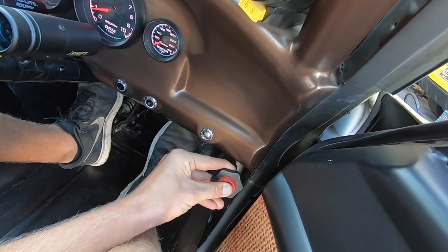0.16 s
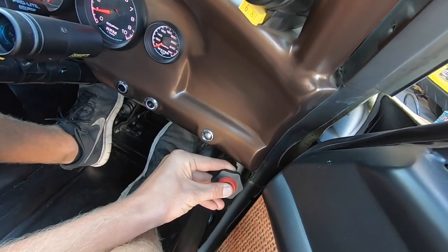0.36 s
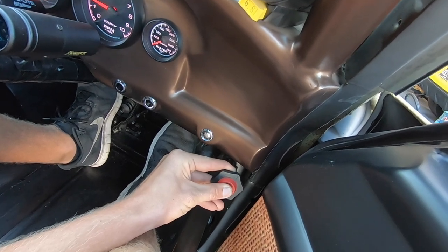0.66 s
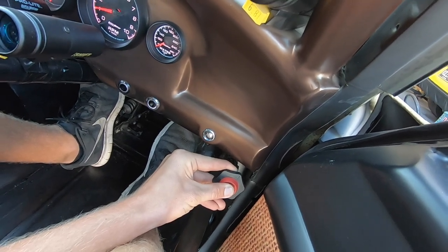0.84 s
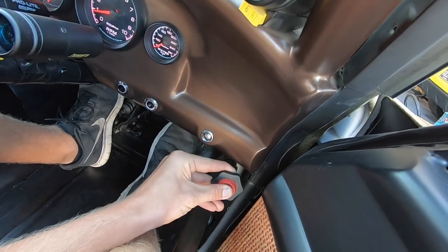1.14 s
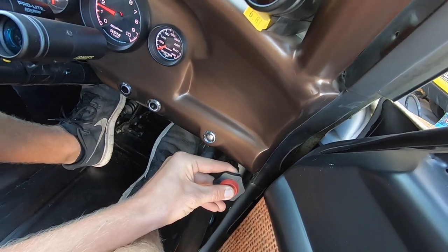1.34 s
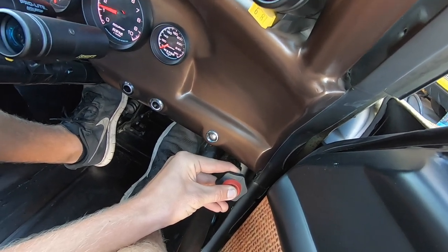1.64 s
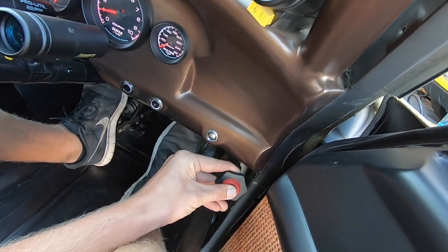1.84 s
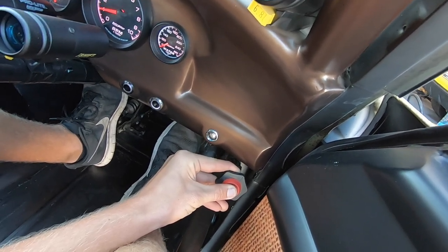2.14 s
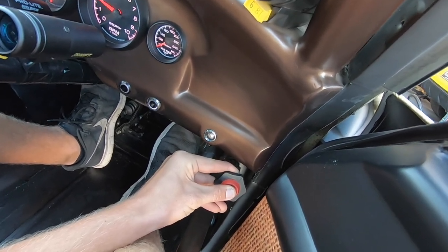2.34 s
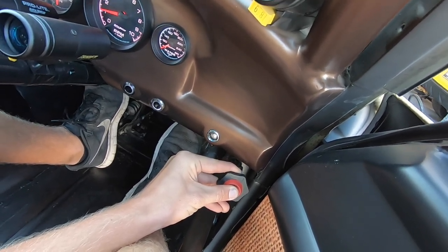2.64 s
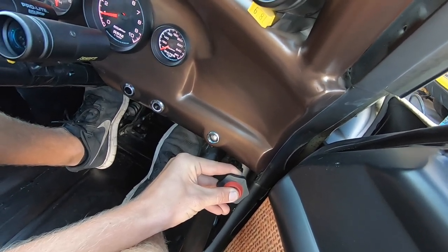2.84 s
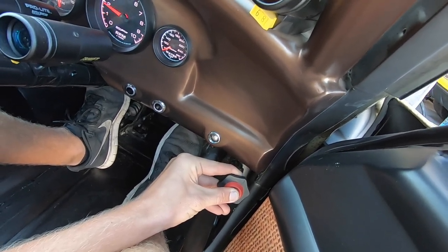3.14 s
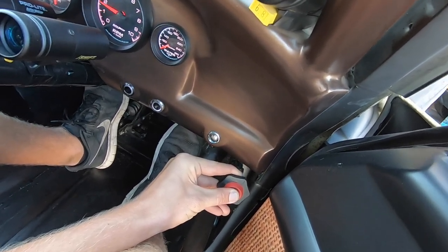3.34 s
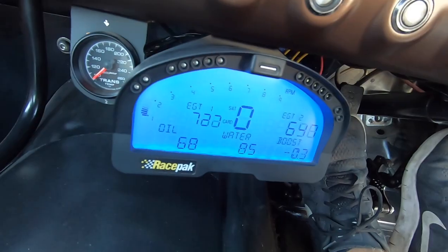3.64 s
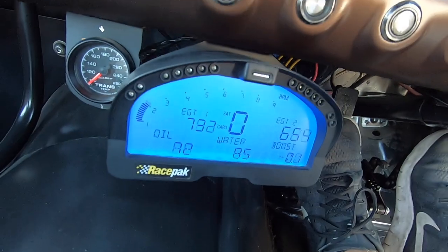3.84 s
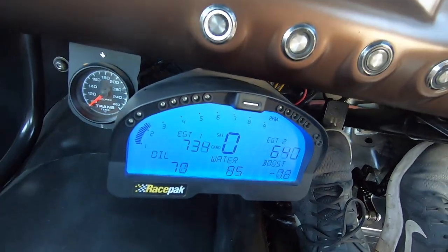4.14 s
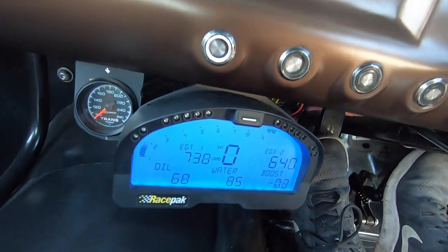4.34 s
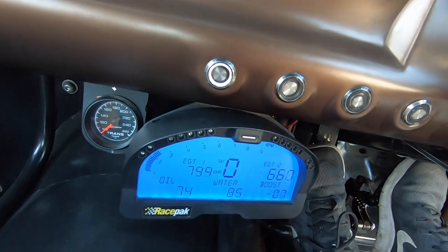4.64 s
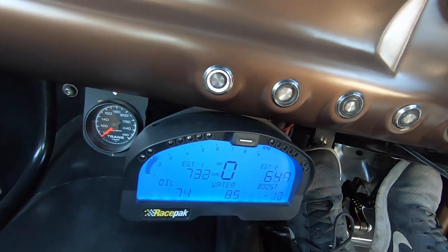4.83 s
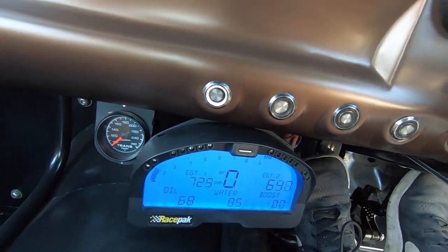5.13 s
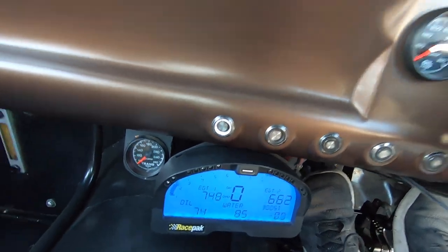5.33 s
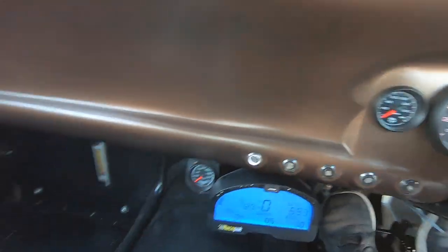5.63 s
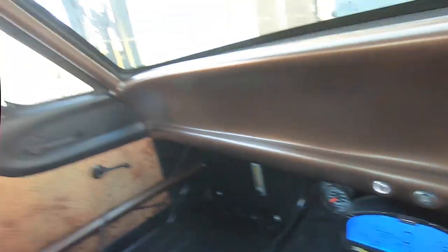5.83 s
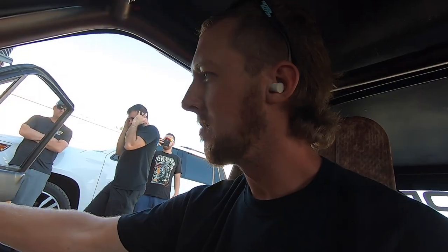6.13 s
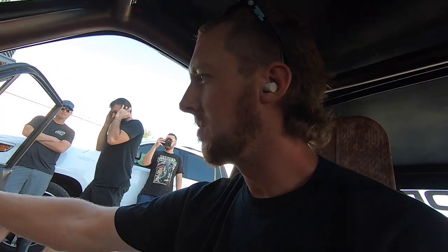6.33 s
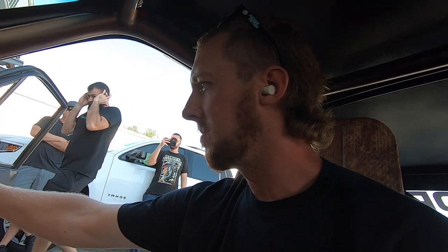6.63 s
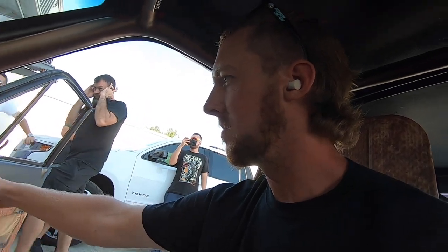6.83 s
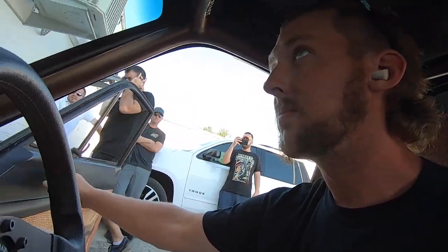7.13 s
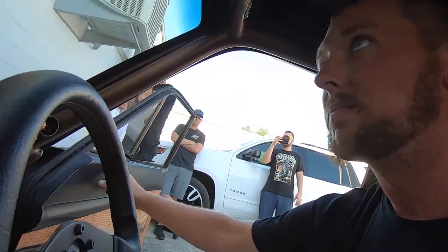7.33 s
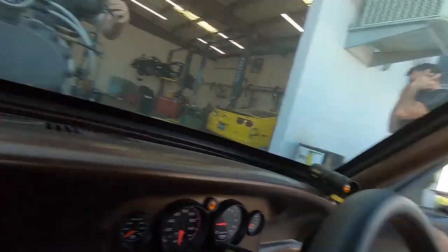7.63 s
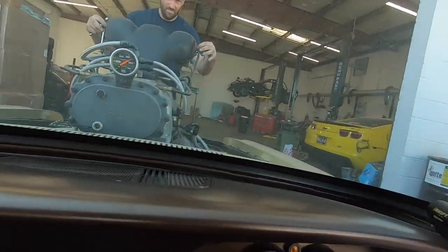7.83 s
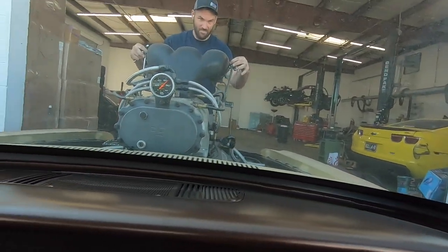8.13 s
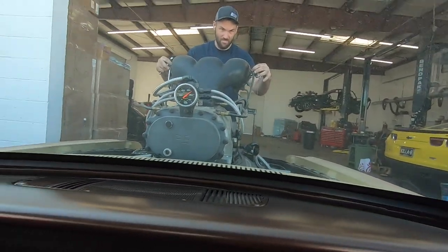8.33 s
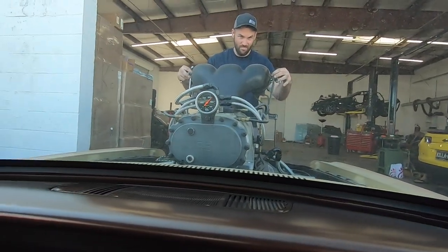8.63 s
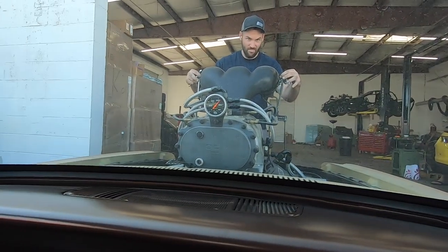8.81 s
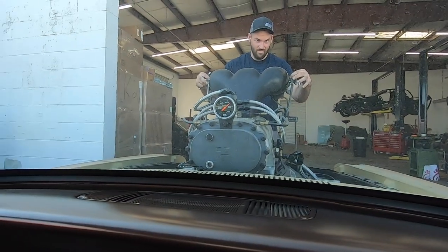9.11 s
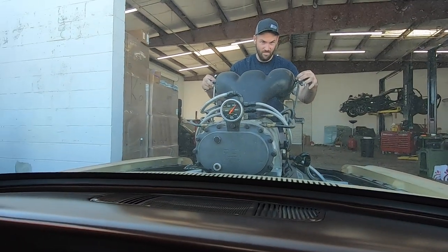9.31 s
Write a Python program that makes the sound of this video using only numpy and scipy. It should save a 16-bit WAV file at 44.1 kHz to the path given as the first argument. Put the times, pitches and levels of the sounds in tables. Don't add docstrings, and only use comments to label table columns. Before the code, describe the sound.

A powerful supercharged eight-cylinder engine hunts at idle throughout, heard inside a bare metal car cabin beside a workshop. From 0 to 3.5 seconds the microphone is in the footwell: strong surges peak near 0.45, 1.3, 2.2 and 3.1, each climbing fast from a slow lumpy throb to a booming, raspy roar, then sagging. In the deep lulls single firings bark hard, ringing the firewall, with missed beats cutting holes in the roar. At 3.5 the sound shifts to the dash, with less panel thump and a duller low roar; surges peak around 3.75, 4.4, 5.1 and 5.8. From 6 seconds, at the windscreen, the tone becomes more mid-range and steadier, surges arriving about every 0.6 to 0.7 seconds with shallower lulls and fewer, softer barks. Cabin bass, knocking panels and low mount rumble continue to the end, around 9.6, without the engine stopping.

```python
import sys
import numpy as np
from scipy import signal
from scipy.io import wavfile
from scipy.ndimage import uniform_filter1d

SR = 44100
rng = np.random.default_rng(int(sys.argv[2]) if len(sys.argv) > 2 else 0)


def convert_level_to_amplitude(level_db):
    exponent = np.asarray(level_db, float) / 20
    return 10 ** exponent


def to_wav(sig):
    pcm = np.clip(np.atleast_2d(sig), -1, 1) * 32767
    pcm = np.round(pcm).astype(np.int16)
    wavfile.write(sys.argv[1], SR, pcm.T)


N = 417627


def rms_one(x):
    return x / np.sqrt(np.mean(x ** 2) + 1e-20)


def at_hz(points, hz):
    points_hz, points_db = np.array(points).T
    return np.interp(np.log(hz), np.log(np.maximum(points_hz, 1)), points_db)


def band(x, low_hz, high_hz, order=2):
    return signal.sosfilt(signal.butter(order, [low_hz, high_hz], "band", fs=SR, output="sos"), x)


def fade(x, seconds):
    r = np.exp(-1 / (seconds * SR))
    return signal.lfilter([1 - r], [1, -r], x + 1e-18)


def resonate(x, modes):
    out = 0
    for k, (hz, width_hz, db) in enumerate(modes):
        r = np.exp(-np.pi * width_hz / SR)
        poles = [1, -2 * r * np.cos(2 * np.pi * hz / SR), r * r]
        ring = signal.lfilter([(1 - r * r) / 2, 0, (r * r - 1) / 2], poles, x)
        out = out + (-1) ** k * convert_level_to_amplitude(db) * ring
    return out


def evened(x, seconds):
    power = uniform_filter1d(x ** 2, int(seconds * SR), mode="mirror")
    return x / np.sqrt(power + 0.01 * np.mean(power))


def drift(per_s):
    r = np.exp(-128 * np.pi * per_s / SR)
    slow = signal.lfilter([1], [1, -2 * r, r * r], rng.standard_normal(N // 64 + 502))[500:]
    return np.interp(np.arange(N) / 64, np.arange(len(slow)), rms_one(slow))


CHANGES_S = [3.5, 6.0]


def by_place(values):
    edges_s = np.ravel([(s - .1, s + .1) for s in CHANGES_S])
    return np.interp(np.arange(N) / SR, edges_s, np.asarray(values)[[0, 1, 1, 2]])


# catch t/s, top t/s, catch rate f/Hz, top rate f/Hz (firings)
SURGES = [(-0.62, -0.42, 62, 135), (0.26, 0.45, 59.6, 138), (1.16, 1.34, 65.6, 139),
          (2.03, 2.21, 58.5, 136), (2.92, 3.14, 61.5, 148), (3.55, 3.74, 66, 129), (4.22, 4.43, 64, 125),
          (4.96, 5.11, 77, 119), (5.62, 5.83, 62, 134), (6.25, 6.46, 78, 120), (6.86, 7.07, 80.6, 123),
          (7.4, 7.67, 78, 123), (8.04, 8.31, 80.8, 119), (8.73, 8.91, 76, 118), (9.35, 9.64, 81, 118)]


def speed():
    sag_per_s2, crawl_lead_hz = 150, 3.0
    catch_s, top_s, slow, fast = np.transpose(SURGES)[:4]
    sagged_s = top_s[:-1] + (fast[:-1] - slow[1:]) / sag_per_s2
    crawl_s = np.minimum(sagged_s, catch_s[1:] - .01)
    s = np.ravel([catch_s, top_s, np.append(crawl_s, 99)], "F")
    rates = np.ravel([slow, fast, np.append(slow[1:] + crawl_lead_hz, 0)], "F")
    per_s = np.interp(np.arange(N) / SR, s, rates)
    return uniform_filter1d(per_s, int(.04 * SR), mode="nearest")


# shut-off delay t/s, strength gain level/dB, lull depth level/dB
LOAD = [(-0.01, 0.0, 14.7), (0.033, -1.0, 24.7), (-0.005, 0.4, 21.3), (0.019, 0.1, 22.2),
        (0.004, -0.7, 21.2), (-0.018, 0.8, 13.8), (-0.005, 1.3, 19.2), (0.016, 1.7, 18.5),
        (-0.022, 0.7, 14.6), (-0.068, 0.0, 7.7), (0.0, -1.8, 10.6), (-0.001, -1.9, 9.3),
        (-0.007, -1.5, 14.4), (0.003, -1.8, 6.8), (0.0, -2.6, 8.0)]


def effort(top_db, early_s, hold_s, droop_db, close_s, rest_s, lull_share, lull_db, catch_db):
    catch_s, top_s = np.transpose(SURGES)[:2]
    late_s, extra_db, depth_db = np.transpose(LOAD)
    depth_db = lull_share * depth_db + lull_db
    shut_s = top_s + hold_s + late_s + close_s
    wake_s = np.minimum(shut_s + rest_s, np.append(catch_s[1:], 99) - .05)
    wake_s = np.maximum(wake_s, shut_s + .005)
    s = np.ravel([catch_s, top_s - early_s, shut_s - close_s, shut_s, wake_s], "F")
    start_db = np.minimum(catch_db, np.roll(depth_db, 1))
    db = np.ravel([start_db, -extra_db, droop_db - extra_db, depth_db, depth_db], "F")
    return by_place(top_db) - np.interp(np.arange(N) / SR, np.maximum.accumulate(s), db)


CYLINDER_DB = [-2, -6.5, 5, 1.5, 0.5, -3.5, -4.2, -1.2]


def firings(per_s, spread_db):
    at = np.flatnonzero(np.diff(np.cumsum(per_s / SR).astype(int)))
    ragged = np.clip((125 - per_s[at]) / 55, .35, 1.3)
    chance = np.clip(rng.standard_normal(1500)[:len(at)], -2.5, 1.4)
    clicks = np.zeros(N)
    clicks[at] = convert_level_to_amplitude(np.resize(CYLINDER_DB, len(at)) + spread_db * ragged * chance)
    return clicks


# t/s, depth level/dB
STUMBLES = [(0.07, 5), (0.23, 4), (1.68, 6), (2.9, 5), (3.53, 9), (3.99, 4), (4.2, 2.5), (4.55, 3),
            (4.69, 8), (5.59, 4), (5.93, 10), (6.14, 3), (6.82, 3), (7.37, 3), (7.45, 4), (8.1, 5),
            (8.24, 4), (8.69, 8), (9.35, 6)]


def low_end(per_s):
    swell_hz, swell_octaves, stumble_s = 97, .3, .03
    tone_base_db, tone_swell_db, tone_pull_db = -17, 4.5, 3.5
    bass_base_db, bass_swell_db, bass_pull_db = -14.3, 1.8, 2.5
    tone_loss_db, bass_loss_db = by_place([4, 20, 12]), 2.5
    t = np.arange(N) / SR
    pulling = np.clip(fade(np.gradient(per_s) * SR, .02) / 150, 0, 1)
    octaves = np.log2(per_s / swell_hz)
    tuned = np.exp(-(octaves / swell_octaves) ** 2)
    above = np.maximum(octaves, 0)
    gaps_db = sum(db * np.exp(-((t - s) / stumble_s) ** 2) for s, db in STUMBLES)
    tone_db = tone_base_db + tuned * tone_swell_db + tone_pull_db * pulling - tone_loss_db * above
    bass_db = bass_base_db + tuned * (bass_swell_db + bass_pull_db * pulling)
    return tone_db, bass_db - bass_loss_db * above - gaps_db


COASTING_DB = [-5, -5, -3, -3, 0, 0]
# f/Hz, width f/Hz, level/dB
CABIN = [(91, 9, 0), (108, 25, -12), (68, 30, -17)]


def boom(per_s, tone_db, bass_db, clicks):
    coasting = np.clip(1 - fade(np.gradient(per_s) * SR, .03) / 150, 0, 1)
    places_s = [0, CHANGES_S[0], *CHANGES_S, CHANGES_S[1], N / SR]
    places_db = np.interp(np.arange(N) / SR, places_s, COASTING_DB)
    stumbling = 20 * np.maximum(np.log2(84 / per_s), 0)
    tone_db = tone_db + coasting * (places_db - stumbling) + 1.2 * drift(14)
    wander = (.2 + .3 * coasting * stumbling) * drift(9)
    tone = np.sqrt(2) * convert_level_to_amplitude(tone_db) * np.sin(2 * np.pi * np.cumsum(per_s) / SR + wander)
    rest = np.sqrt(np.maximum(convert_level_to_amplitude(2 * bass_db) - convert_level_to_amplitude(2 * tone_db), convert_level_to_amplitude(2 * (bass_db - 9))))
    rest = rest * convert_level_to_amplitude(-5 - places_db)
    uneven = clicks - 0.7152 * (clicks > 0) + 0.014 * rng.standard_normal(N)
    both = tone + rest * evened(band(resonate(uneven, CABIN), 58.7, 120), 0.22)
    side = convert_level_to_amplitude(-45) * rms_one(band(rng.standard_normal(N), 50, 130))
    return convert_level_to_amplitude(bass_db) * evened(both, 0.0567) + side * [[1], [-1]]


# t/s, peak level/dB, preceding misfire dip level/dB
BARKS_NEAR = [(0.0385, -27.7, 4), (0.1196, -25, 16), (0.139, -20.5, 0.6), (0.2517, -16.2, 12.7),
              (0.8194, -34.7, 5.8), (0.8824, -22.7, 0.5), (0.945, -23.1, 1.7), (1.082, -19.5, 14.4),
              (1.144, -17.9, 3.3), (1.2199, -17.3, 0.5), (1.732, -21.1, 7.8), (1.7898, -21.5, 1.0),
              (1.9053, -19.2, 3.6), (1.9757, -19.4, 4.0), (2.0156, -15.0, 1.6), (2.0812, -22.5, 3.1),
              (2.212, -18.9, 2.6), (2.322, -22.1, 1.7), (2.508, -31.2, 3.5), (2.5673, -20.8, 6.6),
              (2.6479, -20.3, 13.4), (2.7606, -17.6, 10.0), (2.84, -22.3, 16.7), (2.9367, -15.5, 4.3),
              (3.0041, -15.4, 0.5), (3.152, -22.4, 1.9), (3.4496, -39.7, 4.2)]
# t/s, peak level/dB, dip level/dB
BARKS_FAR = [(3.8826, -25.2, 3.1), (3.9404, -20.7, 6.1), (4.14, -26.9, 7.1), (4.1987, -25.9, 4.5),
             (4.685, -33.1, 5.6), (4.781, -23.7, 0.5), (4.84, -21.6, 0.5), (4.915, -18.3, 0.7),
             (5.3104, -24.1, 4.8), (5.3842, -24.8, 2.4), (5.5104, -25.1, 2.4), (5.5997, -30.7, 8.2),
             (5.8506, -17.7, 0.5), (6.05, -24.9, 3.9), (6.123, -24.4, 0.5), (6.6997, -27.3, 10.9),
             (6.9005, -21.9, 0.5), (7.274, -35.5, 0.5), (7.3723, -30.1, 1.6), (7.8705, -26.4, 3.2),
             (7.9274, -21.3, 5.4), (7.982, -24.2, 8.8), (8.106, -34.0, 4.1), (8.465, -31.4, 6.5),
             (8.5218, -18.0, 4.7), (8.5806, -24.1, 2.5), (8.639, -28.8, 2.5), (8.749, -35.3, 3.3),
             (9.0753, -27.8, 1.0), (9.2549, -29.9, 14.9)]


def misfires():
    s, dip_db = np.transpose([*BARKS_NEAR, *BARKS_FAR])[::2]
    marks = np.zeros(N)
    marks[(s * SR).astype(int)] = np.maximum(dip_db, 0)
    before_s = np.arange(int(.08 * SR)) / SR
    shape = 1 / (1 + np.exp((before_s - .04) / 0.016))
    return convert_level_to_amplitude(-signal.fftconvolve(marks[::-1], shape)[:N][::-1])


# top level/dB per place, lead t/s, hold t/s, droop level/dB, shut-off t/s, rest t/s,
# share of lull depth, extra lull level/dB, catch depth level/dB
THUMP = ([-13, -17, -13.5], .005, .025, 1.3, .183, .137, .33, 7, 7.6)
# f/Hz, width f/Hz, level/dB
FLOOR_PAN = [(127.7, 22.8, -2), (156.3, 26, 1.5)]
# f/Hz, width f/Hz, level/dB
BODY = [(205, 21.2, -1.5), (235.2, 30.2, 0.5), (278, 160, -22)]


def thump(clicks):
    thump_db = effort(*THUMP)
    rough = 0.04 * rng.standard_normal((2, N))
    knocks = clicks * (0.55 + drift(60)) + rough[0]
    load = convert_level_to_amplitude(0.95 * (thump_db + by_place([16.5, 20.5, 18])))
    panels = resonate(knocks, FLOOR_PAN) + load * resonate(knocks, BODY)
    mid, side = band([panels, resonate(rough[1], BODY)], 110, 356)
    side = convert_level_to_amplitude(-27) * rms_one(side)
    return convert_level_to_amplitude(thump_db) * (evened(mid, .09) + side * [[1], [-1]]) * misfires() ** .3


def shake(clicks):
    return convert_level_to_amplitude(-34.5) * rms_one(band(clicks + 0.12 * rng.standard_normal(N), 20, 66))


BARK_LOW_DB = [-6, -0.6, -1.5]


def bark_envelopes():
    s, peak_db = np.transpose([*BARKS_NEAR, *BARKS_FAR])[:2]
    low_db = np.asarray(BARK_LOW_DB)[np.searchsorted(CHANGES_S, s)]
    kicks = np.zeros((2, N))
    kicks[:, ((s - .003) * SR).astype(int)] = convert_level_to_amplitude(2 * np.array([peak_db + low_db - 11.5, peak_db - 17.5]))
    age_s = np.arange(int(.25 * SR)) / SR
    rise = (1 - np.exp(-age_s / .0045)) ** 2
    power = rise / (1 + np.exp((age_s - .03) / .015))
    return np.sqrt(np.abs(signal.fftconvolve(kicks, power[None], axes=1)[:, :N]))


def panel_ring(white):
    size = 8192
    age_s = np.arange(size // 2) / SR
    out = np.zeros(white.shape[:-1] + (N + 3 * size,))
    window = np.sin(np.pi * np.arange(size) / size)
    for i in range(-size // 2, N, size // 2):
        ring = rng.standard_normal(size // 2) * np.exp(-age_s / .009) * convert_level_to_amplitude(-30)
        ring[0] = 1
        piece = np.take(white, np.arange(i, i + size), axis=-1, mode="wrap") * window
        rung = signal.fftconvolve(piece, rms_one(ring)[None, None], axes=-1)
        out[..., i + size:i + size * 5 // 2 - 1] += rung
    return rms_one(out[..., size:size + N])


# top level/dB per place, lead t/s, hold t/s, droop level/dB,
# shut-off t/s, rest t/s, share of lull depth, extra lull level/dB, catch depth level/dB
LOW_ROAR = ([-25.4, -27.5, -27.3], .098, .016, .9, .167, .32, .64, 2.8, 6.8)
HIGH_ROAR = ([-33.4, -36.4, -35.5], .111, .01, .6, .133, .17, .96, 0.51, 5.3)
# f/Hz, density level/dB
FOOTWELL = [(180, -30), (300, 2), (349, -9.5), (382, -3.5), (531, -13), (740, -6.5), (1050, -16),
            (1130, -11), (1800, -19), (3040, -18), (5230, -31.5), (7620, -19), (10900, -49.5), (14200, -73),
            (22000, -120)]
DASH = [(180, -33), (300, -1), (370, -2), (405, -6), (450, -0.5), (531, -8), (618, -5), (676, -9.5),
        (1570, -11.5), (4930, -24.5), (7510, -19.5), (9410, -28.5), (10900, -53.5), (14200, -67),
        (22000, -120)]
WINDSCREEN = [(180, -32), (300, -16), (370, -7.5), (411, 0), (524, -8.5), (774, -9), (835, -9), (927, -8.5),
              (1460, -11.5), (4640, -24), (7510, -20.5), (9550, -29), (10900, -35), (14200, -84),
              (22000, -120)]
# f/Hz, likeness (0-1)
LIKENESS = [(60, 1.0), (130, 1.0), (260, 0.95), (550, 0.82), (1150, 0.3), (2400, 0.78), (5020, 0.3),
            (10500, 0.27)]
# f/Hz, level/dB
LEAN = [(60, 0.0), (130, 0.0), (260, 4), (550, -4), (1150, -0.5), (2400, -1.5), (5020, 0.5), (10500, -3)]
# f/Hz, width f/Hz, level/dB
FIREWALL = [(735, 150, 1.5), (2370, 150, -3), (3200, 130, -5)]


def pipes(clicks):
    puff = rms_one(.6 + np.sqrt(fade(fade(clicks, .004), .008) * SR / 90))
    barks = bark_envelopes()
    roar = convert_level_to_amplitude(np.array([effort(*LOW_ROAR), effort(*HIGH_ROAR)]))
    roar = roar * puff * misfires() ** np.array([[.76], [1]])
    low, high = np.hypot(roar, barks)
    high = np.hypot(high, convert_level_to_amplitude(-60))
    low_db, high_db = 20 * np.log10([low, high])

    t = np.arange(N) / SR
    steps_s = np.ravel([(s - .12, s + 0.14) for s in CHANGES_S])
    edges = 300 * 2 ** np.arange(0, 5.4, 1 / 3)
    centres, widths = np.sqrt(edges[1:] * edges[:-1]), np.diff(edges)
    upper = centres > 1500
    levels = np.array([convert_level_to_amplitude(at_hz(p, centres)) * np.sqrt(widths) for p in (FOOTWELL, DASH, WINDSCREEN)])
    for part in (upper, ~upper):
        levels[:, part] /= np.linalg.norm(levels[:, part], axis=1, keepdims=True)

    white, out = panel_ring(rng.standard_normal((2, 2, N))), 0
    for k, hz in enumerate(centres):
        share = np.clip(np.log(hz / 1000) / np.log(2.2), 0, 1)
        rasp_db = 0.1 * (high_db + 40.5) * np.exp(-np.log2(hz / 2200) ** 2)
        mid, side = band(white[k % 2], edges[k], edges[k + 1]) * np.sqrt(SR / 2 / widths[k])
        alike = np.clip(1.43 * at_hz(LIKENESS, hz) - .35, -.5, .99)
        gain = np.interp(t, steps_s, levels[[0, 1, 1, 2], k])
        flicker_db = 1.76 * drift(21)
        gain = gain * convert_level_to_amplitude((1 - share) * low_db + share * high_db + rasp_db + flicker_db)
        pair = np.sqrt((1 + alike) / 2) * mid + np.sqrt((1 - alike) / 2) * side * [[1], [-1]]
        out = out + gain * pair * convert_level_to_amplitude(at_hz(LEAN, hz) * np.array([[.5], [-.5]]))
    out = signal.sosfilt(signal.cheby2(8, 40, 12400, fs=SR, output="sos"), out)
    shelf = convert_level_to_amplitude(-25) * high * rms_one(band(white[0], 10800, 14700, order=3))
    near = np.interp(t, steps_s[:2], [1, 0])
    firewall = rms_one(resonate(resonate(white[1], FIREWALL), FIREWALL))
    return convert_level_to_amplitude(4.62) * out + shelf + convert_level_to_amplitude(7) * near * barks[1] * firewall


def scene():
    per_s = speed()
    tone_db, bass_db = low_end(per_s)
    clicks = firings(per_s, spread_db=4.5)
    return boom(per_s, tone_db, bass_db, clicks) + thump(clicks) + shake(clicks) + pipes(clicks)


def top_cut(x):
    return signal.sosfilt(signal.butter(12, 15700, fs=SR, output="sos"), x)


def record(dry):
    limited = dry / (1 + (dry / .92) ** 6) ** (1 / 6)
    return top_cut(limited)


dry = scene()
out = record(dry)
to_wav(out)
```